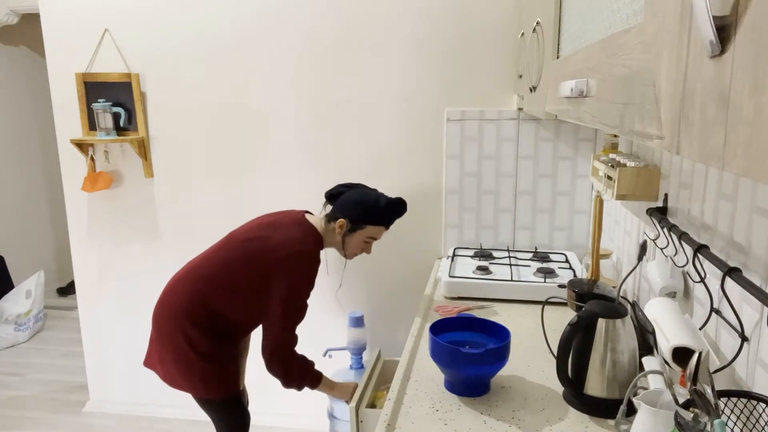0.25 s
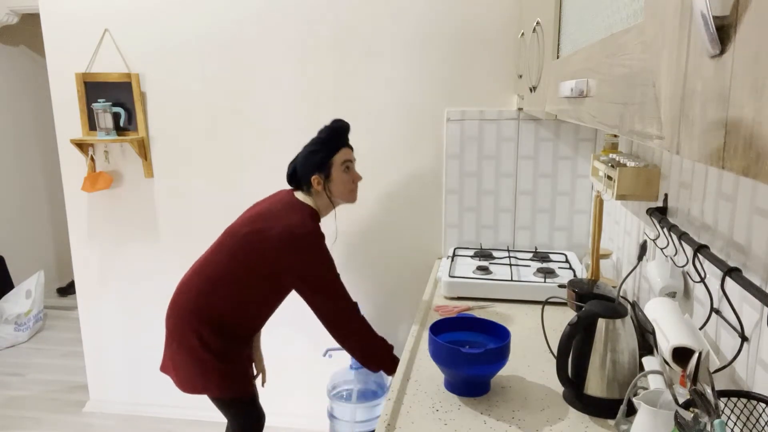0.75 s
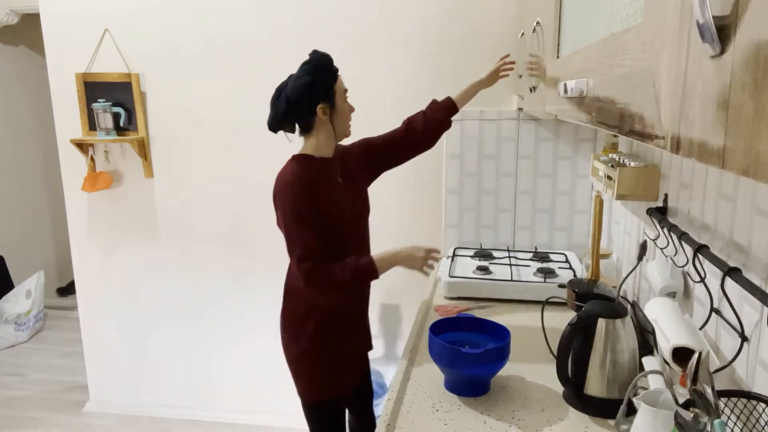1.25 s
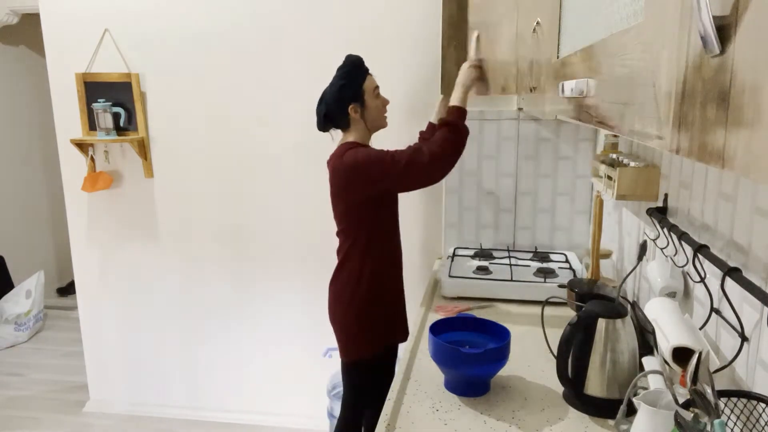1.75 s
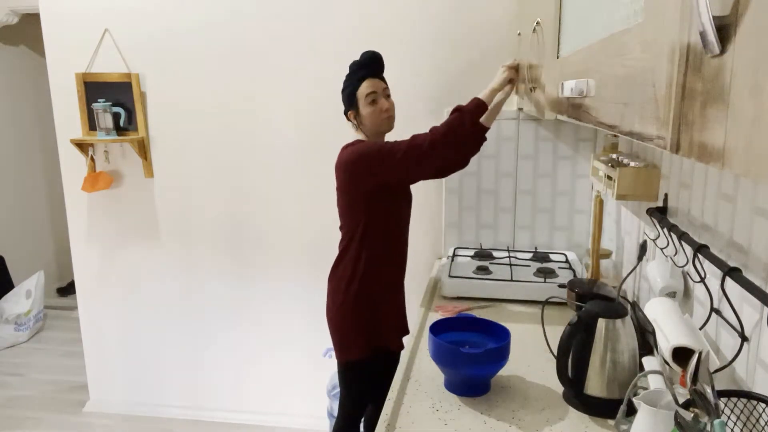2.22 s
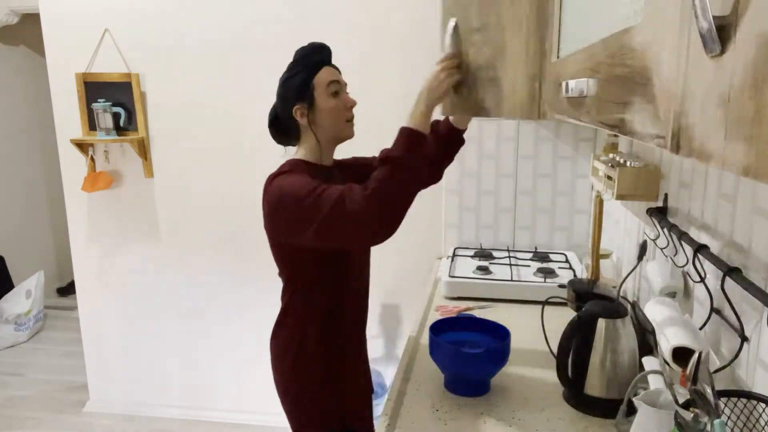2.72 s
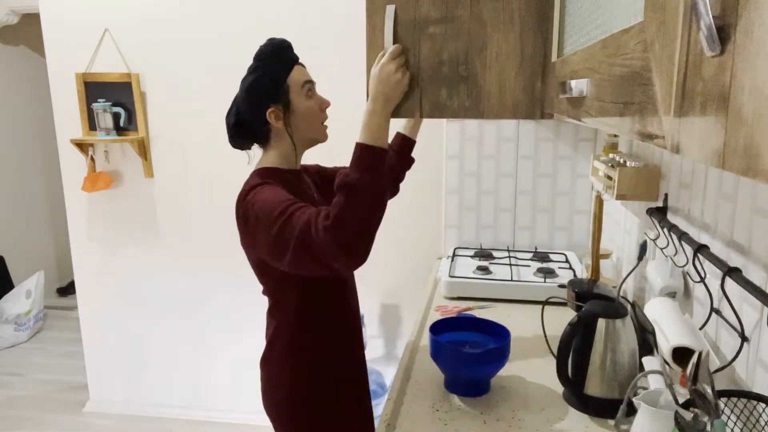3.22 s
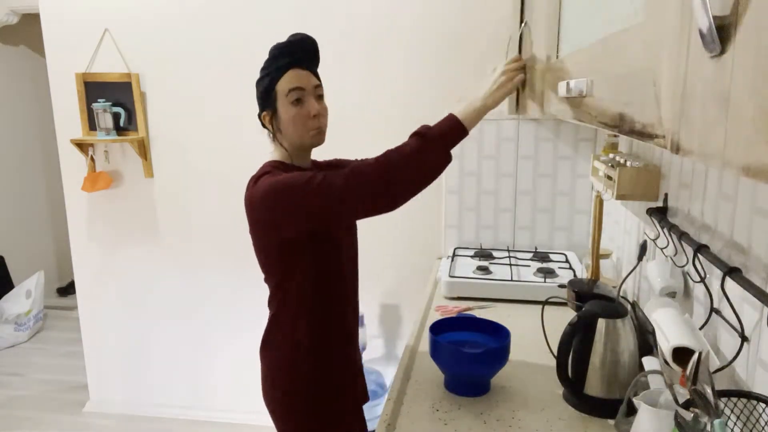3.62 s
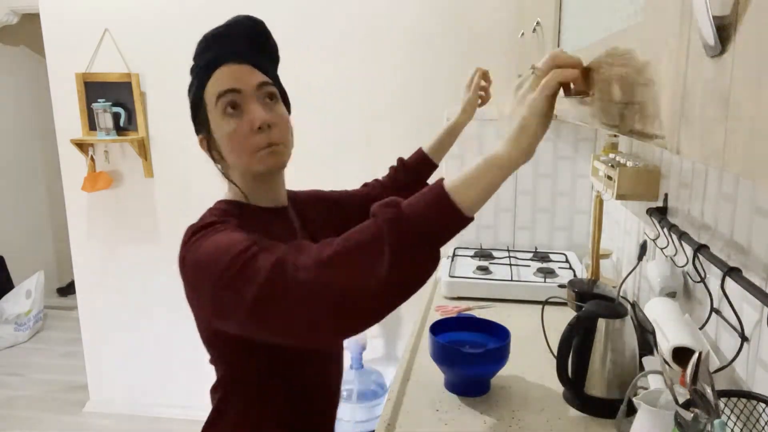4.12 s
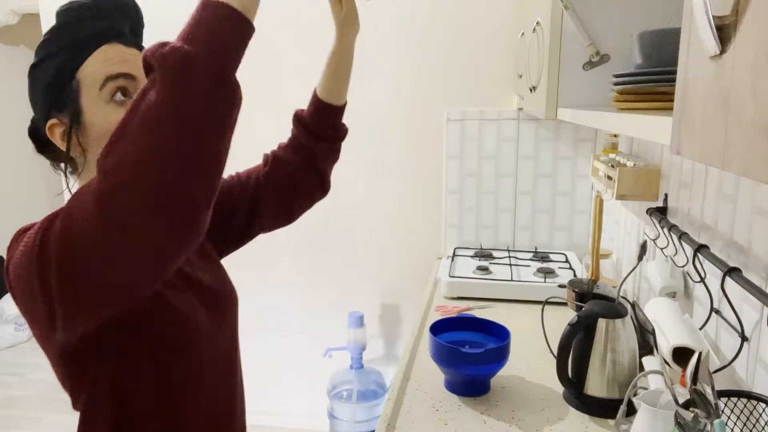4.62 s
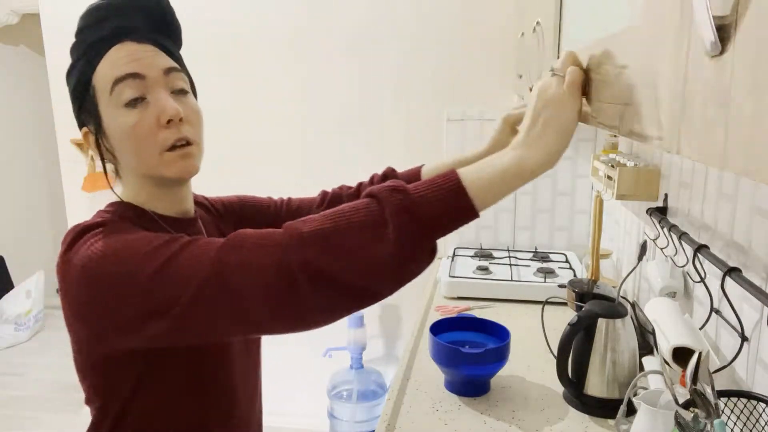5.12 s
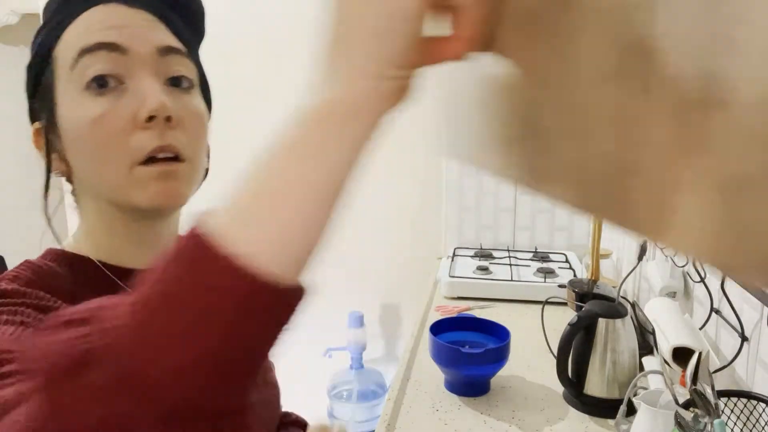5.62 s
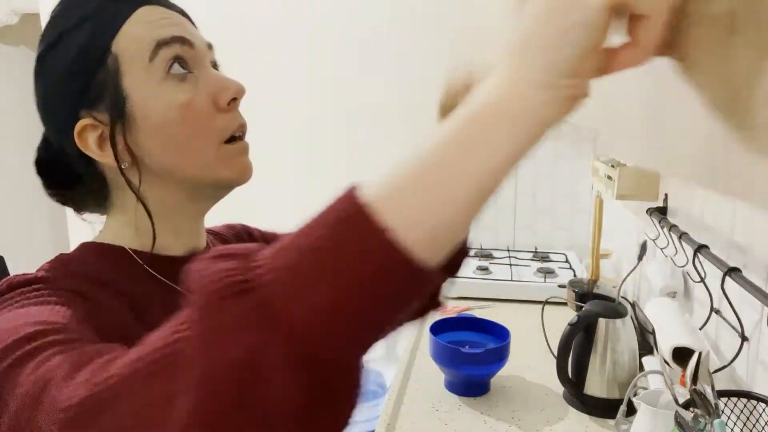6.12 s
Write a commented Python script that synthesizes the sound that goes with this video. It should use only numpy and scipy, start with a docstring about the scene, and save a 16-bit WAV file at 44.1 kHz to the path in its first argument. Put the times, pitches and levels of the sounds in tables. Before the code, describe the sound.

Fixed stereo pickup in a quiet, hard-walled kitchen, sounds leaning slightly right. A drawer judders open with rising roller jolts, clacks, then rolls shut. Loose wooden knocks crowd into two strong cupboard bangs, the boxes booming briefly. Quiet again, then a boomy shut with crisp double clacks. Later doors come closer and drier: steely hinge clicks, a thin spring ping, small rattles, a sharper knock, and faint final thuds.

```python
"""Cupboard doors knock, thud and slam in a small tiled kitchen, after a drawer is rolled out and pushed home.
Each blow is a click and shaped noise, with ringing woodwork and a brief hard-walled tail.
Cupboard boxes boom at their own notes; sprung hinges click and ping as noise bursts and sagging coil partials.
The drawer is grainy roller noise, wooden judder and rising jolts; filtered noise makes the sleeves, the scrapes,
the tails of spring snaps, the moving doors and the soft room tone."""
import sys
import numpy as np
from scipy import signal
from scipy.io import wavfile

SR = 44100
rng = np.random.default_rng(int(sys.argv[2]) if len(sys.argv) > 2 else 0)


def store_wav(level_fs):
    """Save 16-bit WAV to argv[1]."""
    pcm = np.round(np.clip(np.atleast_2d(level_fs), -1, 1) * 32767)
    wavfile.write(sys.argv[1], SR, pcm.T.astype(np.int16))


N = 280211

# where thud, knock, clack, crack and tick lie: centre_hz
COLOUR_HZ = [90, 320, 880, 2200, 6000]
# decay of the kitchen's tail: pitch_hz, t60_s
KITCHEN_T60 = [(60, 0.44), (120, 0.24), (250, 0.36), (700, 0.35), (2000, 0.41), (5000, 0.43), (12000, 0.31)]
# noise bands: edges and centres in Hz, and one filter each
EDGES = np.r_[25, 50, 100, 160, 230, 320 * 2 ** np.arange(0, 6.1, .5)]
CENTRES = np.sqrt(EDGES[1:] * EDGES[:-1])
BANK = [signal.butter(2, edges, "band", fs=SR, output="sos") for edges in zip(EDGES, EDGES[1:])]
TAIL = np.arange(int(.44 * SR)) / SR   # time axis of one struck sound, s


def from_db(db):
    """Decibels to gain."""
    return 10 ** (np.asarray(db) / 20)


def rms_one(x):
    """Scale to rms 1."""
    return x / np.sqrt(np.mean(x ** 2) + 1e-20)


def at_hz(points, hz):
    """Read a table on a log-frequency axis."""
    points = np.array(points)
    return np.interp(np.log(hz), np.log(points[:, 0]), points[:, 1])


def dying(t60):
    """A decay of 60 dB in t60 seconds."""
    return np.exp(-np.log(1000) * TAIL / max(t60, 1e-3))


def add(track, s, sound):
    """Lay a sound into the track at time s."""
    start = max(round(s * SR), 0)
    track[:, start:start + sound.shape[1]] += sound[:, :N - start]


def wander(per_s):
    """A random curve over the whole scene, gliding between per_s new values a second."""
    return np.interp(np.arange(N) / SR * per_s, np.arange(N), rng.standard_normal(N))


def pair(white, hz):
    """Mix two noises to left and right with the stereo likeness of this pitch."""
    # pitch_hz, left-right correlation
    likeness = [(40, 0.27), (100, 0), (200, 0.032), (400, 0), (1000, 0), (15000, 0)]
    alike = np.clip(at_hz(likeness, hz), -1, 1)
    middle = np.sqrt((1 + alike) / 2) * white[0]
    side = np.sqrt((1 - alike) / 2) * white[1]
    return middle + side * [[1], [-1]]


def friction(spectrum, grain_db, grains_per_s):
    """Stereo noise whose strength glides from one tiny slip to the next; rms 1."""
    slips = wander(grains_per_s)
    white = rng.standard_normal((2, 2, N)) * from_db(grain_db * slips)
    out = np.zeros((2, N))
    for k, hz in enumerate(CENTRES):
        if spectrum[0][0] < hz and EDGES[k] < spectrum[-1][0]:
            band = signal.sosfilt(BANK[k], pair(white[k % 2], hz))
            out += from_db(at_hz(spectrum, hz)) * band
    return rms_one(out)


def strokes(rows, attack_db_per_s, release_db_per_s):
    """Gain over time of movements that gather speed, hold it and die away."""
    t = np.arange(N) / SR
    levels = []
    for start, length, db in rows:
        before = np.maximum(start - t, 0)
        after = np.maximum(t - start - length, 0)
        levels.append(db - attack_db_per_s * before - release_db_per_s * after)
    return from_db(np.maximum(np.max(levels, axis=0), -150))


def resonance(x, hz, width):
    """A two-pole resonance with gain 1 at its top."""
    r = np.exp(-np.pi * width / SR)
    poles = [1, -2 * r * np.cos(2 * np.pi * hz / SR), r * r]
    return (1 - r * r) / 2 * signal.lfilter([1, 0, -1], poles, x + 1e-18)


def ring(modes, pitch=0.96, tilt_db=0.0, room_db=-16.0, rise_s=0.00084, detune=0.0099):
    """Struck modes (Hz, dB, t60 s) scaled by pitch; each leaves a fainter, detuned tail in the kitchen."""
    out, swell = 0, 1 - np.exp(-TAIL / max(rise_s, 1e-4))
    for hz, db, t60 in modes:
        hz = hz * pitch
        phase = rng.uniform(0, 2 * np.pi) + rng.uniform(0, np.pi, (2, 1))
        direct = np.exp(2j * np.pi * hz * TAIL) * dying(t60)
        tail_hz = hz * (1 + detune * rng.standard_normal())
        tail = np.exp(2j * np.pi * tail_hz * TAIL) * dying(at_hz(KITCHEN_T60, hz))
        tail = from_db(room_db) * tail * np.exp(2j * np.pi * rng.random((2, 1)))
        sides = direct * np.exp(1j * phase) + tail
        octaves = np.log2(hz / (modes[0][0] * pitch))
        out = out + from_db(db + tilt_db * octaves) * sides.imag
    return out * swell


def doors(level_db=-5.0, lead_s=.0005):
    """All shuts, bumps and clicks, sounding through the cupboards' woodwork."""
    hits = np.zeros((2, N))
    for s, sound in [*shuts(), *bumps(), *clicks()]:
        add(hits, s - lead_s, carcass(sound))
    return from_db(level_db) * hits


def shuts(clack_gain_db=4.0):
    """Each panel clacks on its stop, flexes, and falls back once more, duller; yields (s, sound)."""
    # a door or the drawer meets its stop; levels are relative: start_s, level_db, weight_db, hardness_steps,
    # panel_ring_s, rebound_after_s, rebound_db, low_note_hz, low_note_lift_db, rebound_note_hz,
    # clack_db, clack_pitch_ratio, door_modes_db
    stops = [(0.265, -29, 5.5, 1, 0.18, 0.031, -6.5, 81.7, 1, 88, -34.5, 2.07, -1),
             (0.789, -44.5, 10.5, 0.5, 0.083, 0.039, -6.5, 81.5, 6.5, 71.6, -42, 2.2, -13),
             (2.132, -23, -2, -3, 0.1, 0.055, -5.5, 136.6, 16, 141, -27.5, 0.78, -8),
             (2.366, -22.5, 4, 4.5, 0.2, 0.036, -7, 82.1, 5, 83.8, -17.5, 1.16, -0.5),
             (3.63, -37, 2, -4, 0.18, 0.03, -11, 155.6, 2, 91.8, -48.5, 1.17, -15),
             (3.879, -29, 8.5, 0.83, 0.036, 0.038, -12.5, 81.3, -6, 295, -28, 0.99, -14),
             (3.948, -36, 2.5, 3, 0.15, 0.035, -12.5, 42.5, 5, 313, -25.5, 1.04, 0.5),
             (5.055, -38.5, 2, -2.2, 0.073, 0.056, -28, 86.7, 3.5, 77.6, -37, 0.99, -8),
             (5.221, -34.5, 5, 2.5, 0.26, 0.067, -6.5, 286, 16, 112, -35, 0.74, -1),
             (6.184, -41.5, 1.5, -6, 0.11, 0.043, -17.5, 122.8, 7.5, 108.4, -42.5, 1.47, -8.5)]
    # level_db of thud, knock, clack, crack and tick of wood on wood
    wood_colour_db = [4, -1, 13.5, -10, -23.5]
    # quick, woody clack of a door's edge on the frame, before the pitch ratio: pitch_hz, level_db, t60_s
    edge_modes = [(461, 4, 0.072), (726, -8.5, 0.08), (1250, -8.5, 0.074), (1862, -1, 0.046),
                  (2610, -6, 0.058), (3380, -16, 0.014)]
    rebound_softens, rebound_ring_s = 5.6, 0.17   # hardness steps lost by the second touch, and its ring
    rebound_note_db = 8   # lift of the note that the second touch sets ringing
    gentle_contact_s = 0.00044   # contact time added by each step of hardness below zero
    clack_dulls_db = 1   # treble lost per octave for each step of hardness below zero
    for (s, level_db, weight_db, hardness, ring_s, after_s, rebound_db, low_hz, low_db, rebound_hz,
         clack_db, pitch, modes_db) in stops:
        first = colour(wood_colour_db, level_db, weight_db, hardness)
        gentle_s = gentle_contact_s * max(-hardness, 0)
        hit = strike(s, level_db, first, ring_s, click_db=6.0, padding_s=0.0003 + gentle_s)
        hit = hit + from_db(low_db) * bending(low_hz, first)
        tilt_db = clack_dulls_db * min(hardness, 0)
        clack = ring(edge_modes, pitch, tilt_db, room_db=-21.5, rise_s=0.0027 + gentle_s)
        yield s, door_modes(hit, modes_db) + from_db(clack_gain_db + clack_db) * clack

        again_s, again_db = s + after_s, level_db + rebound_db
        second = colour(wood_colour_db, again_db, weight_db, hardness - rebound_softens)
        note = from_db(rebound_note_db) * bending(rebound_hz, second)
        hit = strike(again_s, again_db, second, rebound_ring_s, click_db=1.5, padding_s=0.0005) + note
        yield again_s, door_modes(hit, modes_db)


def bumps(hollow_gain_db=6.0, note_cycles=15.2):
    """Soft knocks, each with the low note, hollow note and ring time of its place; yields (s, sound)."""
    # hands, handles, rollers and loose panels bump; levels are relative: start_s, level_db, weight_db,
    # hardness_steps, low_note_hz, hollow_note_hz, hollow_note_db, ring_time_multiple
    knocks = [(0.118, -30.5, 4.5, -6.5, 73.4, 280, -18, 1.2), (0.3, -31.5, 12.5, -6, 143, 467, -20, 1),
              (0.345, -48, 4, -6, 78.5, 268, -33, 1), (0.385, -45, 17.5, -13, 90, 265, -34, 1),
              (0.448, -39.5, 16, -0.5, 63.7, 297, -26, 1), (0.558, -31, 2.5, -8, 224, 255, -40, 1),
              (0.581, -42, 9, 4.5, 85, 433, -25, .9), (0.612, -50, 10, -2, 150, 390, -30.5, .8),
              (0.644, -35, -2, -1, 168, 466, -25, .8), (0.679, -37, -5, 2.5, 88.5, 245, -23, .9),
              (0.712, -43, 4, 2, 111, 630, -29.5, .9), (0.728, -44.5, 21.5, -21, 59.6, 617, -53, 1),
              (0.811, -41, 12.5, -7, 127, 265, -27, .9), (0.834, -47.5, 10.5, -19, 99, 271, -38.5, .8),
              (1.409, -44, 15, -1.5, 84.1, 690, -44, 1), (1.571, -43, -6, -3, 94, 280, -44, 1),
              (1.683, -44.5, 3.5, -2.5, 88, 964, -44.5, 1), (1.777, -32.5, -3, 0, 212, 866, -35.5, .9),
              (1.877, -34, -4, -1.5, 150, 560, -34.5, 1), (1.931, -25.5, 0, -0.5, 145, 385, -19.5, .9),
              (1.955, -26, -11, -1, 151, 500, -22, 1.1), (1.983, -34.5, 3, -4, 133, 476, -28, 1),
              (2.081, -36, 0, -2, 149, 589, -28, .8), (2.093, -26.5, -7, -17.5, 197, 292, -15, .7),
              (2.128, -28.5, -6, -1.5, 139, 1192, -23, .8), (2.158, -25.5, 6.5, -8, 143, 771, -23, 1),
              (2.267, -27.5, 9, 0, 123.6, 520, -34, .95), (2.408, -33.5, 11, -5, 104, 660, -29, 1),
              (2.438, -34.5, 10.5, -3, 70, 530, -37, .6), (2.478, -32, 0, -10, 227, 930, -30.5, .8),
              (2.732, -57.5, 24, 4, 93.4, 402, -61, 1), (2.975, -42.5, 15, 0.5, 154.5, 730, -52, .9),
              (3.042, -35, 4, -21, 95.8, 347, -36.5, 1), (3.409, -68, 15.5, -5.5, 81.4, 423, -67, 1),
              (3.659, -45, -2.5, -1, 341, 695, -37, 1.1), (3.9, -33.5, 6, -5.5, 125, 772, -31, .7),
              (4.224, -50, 12, 6.5, 263, 525, -42, .8), (4.332, -36.5, 6.5, 1.5, 279, 454, -43, .9),
              (4.355, -29, -1, -3.5, 256, 294, -30.5, .8), (4.435, -36, 10.5, 2.5, 120, 295, -34, .7),
              (4.46, -31, 7, 4.5, 86, 1287, -39, .7), (4.53, -35.5, 4.5, -8, 98, 1390, -46, .8),
              (4.664, -37.5, 0, 0.5, 130, 883, -40, .8), (4.703, -43, -12, -1, 126, 860, -50, .7),
              (4.859, -39.5, 6, -8, 129.3, 330, -69, .9), (4.895, -36, 0, -6, 90.6, 375, -45, .9),
              (5.484, -37.5, 6.5, -3.5, 173, 410, -39, .5), (5.502, -33.5, 8, -15, 87, 335, -29, .6),
              (5.56, -52, -8, -6, 238, 640, -48, .5), (5.574, -42.5, -1.5, -11, 190, 517, -39, .5),
              (5.75, -54, 9.5, -1, 123, 270, -54, .7), (5.913, -57.5, -1.5, -10, 232, 423, -60.5, 1.3),
              (6.108, -56.5, 6, -6, 91.3, 380, -55, .7), (6.218, -47.5, 5, -6, 134.4, 292, -45, .7)]
    # level_db of thud, knock, clack, crack and tick; a padded contact has little treble
    padded_colour_db = [-3, -4, -0.5, -24, -27]
    # modes of the hollow note, before the ring multiple: pitch_multiple, level_db, t60_s
    hollow_modes = [(.66, -10.5, 0.079), (.83, -6, 0.053), (.96, -2, 0.068), (1.029, -4, .07),
                    (1.45, -16, 0.041), (1.95, -17.5, 0.063)]
    ring_s, note_db = 0.15, 7.5   # ring of the panel before its multiple; lift of the low note
    for s, level_db, weight_db, hardness, low_hz, hollow_hz, hollow_db, rings in knocks:
        colour_db = colour(padded_colour_db, level_db, weight_db, hardness)
        modes = [(ratio, db, t60 * rings) for ratio, db, t60 in hollow_modes]
        hollow = from_db(hollow_gain_db + hollow_db) * ring(modes, hollow_hz, room_db=-18.0, rise_s=0.0022)
        low = from_db(note_db) * bending(low_hz, colour_db, cycles=note_cycles * rings)
        knock = strike(s, level_db, colour_db, ring_s * rings, click_db=-12.0, padding_s=0.0003)
        yield s, knock + low + hollow


def clicks():
    """Metal catches and handles touch, light and bright; yields (s, sound)."""
    # start_s, level_db (relative)
    touches = [(0.265, -33.5), (0.787, -44.5), (1.469, -49), (1.776, -61), (4.223, -53.5), (4.457, -51),
               (5.48, -50), (5.498, -51.5), (5.53, -65), (5.563, -67)]
    # level_db of thud, knock, clack, crack and tick
    metal_colour_db = [-4.5, -2, 0, -5.5, -1]
    for s, level_db in touches:
        colour_db = level_db + np.array(metal_colour_db)
        yield s, strike(s, level_db, colour_db, ring_s=0.032, click_db=7.0, padding_s=0)


def colour(base_db, level_db, weight_db, hardness):
    """Weight adds to the thud; hardness lifts everything above the knock."""
    # db_per_hardness_step for thud, knock, clack, crack and tick
    hardness_db = [0, 0, 1.5, 2.5, 4]
    out = level_db + np.array(base_db) + hardness * np.array(hardness_db)
    return np.r_[out[0] + weight_db, out[1:]]


def strike(s, level_db, colour_db, ring_s, click_db, padding_s):
    """A blow at time s: the stronger it is, the shorter the contact; padding draws it out."""
    # how much kitchen each blow carries: time_s, room_db
    room_amount = [(0, -3), (1.8, -6), (2.4, -4.5), (3.0, -10.5), (3.9, -7.5), (4.4, -16), (5.1, -19.5),
                   (5.55, -16.5), (6.2, -10.5)]
    room_db = np.interp(s, *np.transpose(room_amount))
    loudest_contact_s, shortens = 0.00029, 0.23   # contact at 0 dB; dB of contact time lost per dB of force
    contact_s = padding_s + loudest_contact_s * from_db(-shortens * level_db)
    return blow(colour_db, ring_s, room_db, contact_s, click_db)


def blow(colour_db, ring_s, room_db, contact_s, click_db, wall_s=0.0066, body_s=0.004, body_cycles=3.38):
    """One contact: a click, the dense ring of the panel, then the kitchen's tail, band by band."""
    # general colour of a struck panel: pitch_hz, level_db
    panel_colour = [(35, -11.5), (70, -5.5), (130, -2), (200, 1), (450, -5.5), (620, -7), (900, -20),
                    (1400, -9), (2000, 3), (2800, 0), (4000, -4), (6000, -7), (10000, -12), (15000, -17.5)]
    # how long each region rings in the panel: pitch_hz, ring_time_multiple
    panel_ring = [(60, 2.4), (150, 1.7), (400, 1.1), (1000, .6), (3000, .5), (12000, .6)]
    white, out = rng.standard_normal((2, 2, len(TAIL))), 0
    click = np.zeros((2, len(TAIL)))
    click[[0, 1], rng.integers(130, 200, 2)] = from_db(click_db) * 2   # 3 to 4.5 ms in, apart on each side
    grip = (1 - np.exp(-TAIL / max(contact_s, 1e-4))) ** 2   # the faces meet gradually
    walls = from_db(room_db) * grip * (1 - np.exp(-TAIL / wall_s))
    for k, hz in enumerate(CENTRES):
        panel = grip * dying(ring_s * at_hz(panel_ring, hz))
        room = walls * dying(at_hz(KITCHEN_T60, hz))
        noise = pair(white[k % 2], hz) * np.sqrt(panel ** 2 + room ** 2)
        band = signal.sosfilt(BANK[k], noise + click * (-1) ** k)
        # the blow's strength in this band is that of its first few cycles
        strength = np.sqrt(np.mean(band[:, :int((body_s + body_cycles / hz) * SR)] ** 2))
        level_db = np.interp(np.log(hz), np.log(COLOUR_HZ), colour_db) + at_hz(panel_colour, hz)
        out = out + band * (from_db(level_db) / strength)
    return out


def bending(hz, colour_db, cycles=15.5, spread=0.24):
    """The panel flexes at one low note that swells in about a cycle, out of step on the two sides."""
    phase = rng.uniform(0, 2 * np.pi) + spread * np.array([[.5], [-.5]])
    swell = (1 - np.exp(-TAIL * hz)) * dying(cycles / hz)
    level_db = 9 + np.interp(np.log(hz), np.log(COLOUR_HZ), colour_db)
    return from_db(level_db) * swell * np.sin(2 * np.pi * hz * TAIL + phase)


def door_modes(sound, modes_db, spread_db=2.5):
    """A blow sets the door's modes ringing, each with a random strength."""
    # pitch_hz, width_hz, lift_db (before the strength of each blow)
    panel_modes = [(233, 14, 0), (530, 22, -2), (744, 16, -4), (895, 18, -4), (1008, 16, -3), (1158, 14, 2),
                   (1402, 28, -2), (1508, 14, -4), (1714, 24, -7), (1892, 34, 2.5), (2300, 20, -4),
                   (2470, 24, -4), (2667, 18, -3)]
    lifts = modes_db + spread_db * rng.standard_normal(len(panel_modes))
    ringing = sum(from_db(db + lift) * resonance(sound, hz, width)
                  for (hz, width, db), lift in zip(panel_modes, lifts))
    return sound + ringing


def carcass(sound):
    """The sides and shelves draw energy from a blow and give it back at their modes, differently each time."""
    # pitch_hz, width_hz, lift_db (before the random lift of each blow)
    shelf_modes = [(350, 14, -4), (390, 14, -4), (448, 16, -6), (565, 14, -6), (612, 18, -7), (668, 20, -8),
                   (802, 22, -7), (867, 16, -6), (921, 16, -4), (1077, 16, -4)]
    lifts = 3 * rng.standard_normal(len(shelf_modes))
    drawn = .25 * resonance(sound, 600, 700)
    given_back = sum(from_db(db + lift) * resonance(sound, hz, width)
                     for (hz, width, db), lift in zip(shelf_modes, lifts))
    return sound - drawn + given_back


def booms(spread=0.74):
    """Cupboard boxes take up blows, swell and ring on at their own notes, out of step on the two sides."""
    # start_s, pitch_hz, level_db, swell_s, t60_s
    box_notes = [(1.396, 87, -33, 0.018, 0.12), (1.953, 423.3, -33, .012, 0.23),
                 (2.137, 410, -27.5, 0.011, 0.18), (2.177, 228.7, -23, 0.015, 0.21),
                 (2.186, 138.6, -21, 0.013, 0.12), (2.389, 236.5, -20, .022, 0.19),
                 (3.607, 155.4, -21, 0.035, 0.064), (3.639, 495.5, -38.5, 0.023, 0.13),
                 (4.663, 828, -35.5, 0.0034, 0.051), (5.499, 466, -40, 0.007, 0.12),
                 (5.546, 441, -44.5, .02, .11), (5.559, 229, -38, 0.013, 0.12),
                 (6.186, 508, -41.5, .005, 0.088), (6.186, 226.4, -45, 0.0054, 0.42)]
    twin_ratio, twin_db = 1.2, -2.5   # a neighbouring mode beats against each note
    out = np.zeros((2, N))
    for s, hz, level_db, swell_s, t60 in box_notes:
        swell = np.minimum(TAIL / swell_s, 1) ** 2
        envelope = swell * from_db(-60 * np.maximum(TAIL - swell_s, 0) / t60)
        phase = 2 * np.pi * hz * TAIL + rng.uniform(0, 2 * np.pi) + spread * np.array([[.5], [-.5]])
        twin = from_db(twin_db) * np.sin(twin_ratio * phase + rng.uniform(0, 2 * np.pi, (2, 1)))
        add(out, s, from_db(level_db) * envelope * (np.sin(phase) + twin))
    return out


def hinges():
    """Springs snap over their dead point, loose parts rattle, and now and then a coil pings."""
    # springs snapping over: start_s, level_db
    spring_snaps = [(4.328, -38.5), (4.349, -48), (4.409, -62), (4.472, -44.5), (4.811, -55.5),
                    (5.2446, -37.5)]
    # hinge resonances: pitch_hz, width_hz, level_db (relative)
    steel_modes = [(3340, 110, -0.5), (4110, 150, 7.5), (4760, 140, 7.5), (5380, 370, 6.5), (6020, 650, 2),
                   (6380, 200, 4.5), (7300, 370, -10), (8600, 1200, -10.5)]
    # loose catches and hinge arms: start_s, pitch_hz, level_db
    rattles = [(4.409, 2220, -57), (4.438, 1350, -58), (4.461, 2980, -50.5), (4.472, 4000, -46),
               (4.484, 2520, -46), (4.538, 1620, -56), (4.565, 3220, -59.5), (4.666, 1680, -61),
               (4.703, 2570, -65), (4.728, 2570, -70.5), (4.769, 4500, -68), (4.782, 4570, -67),
               (4.989, 6800, -63), (5.058, 6250, -63), (5.222, 2560, -33.5), (5.532, 2040, -63),
               (5.563, 2100, -67)]
    # spring coils plucked as a hinge turns: start_s, pitch_hz, level_db, t60_s
    plucked = [(4.997, 6570, -44.5, 0.068), (5.01, 3430, -67, 0.4)]
    rattle_width_hz = 130
    out = np.zeros((2, N))
    for s, level_db in spring_snaps:
        add(out, s, from_db(level_db) * snap(steel_modes))
    for s, hz, level_db in rattles:
        rattle = snap([(hz, rattle_width_hz, 0)], rattle_t60=0.042, room_db=-29.0)
        add(out, s, from_db(level_db) * rattle)
    for s, hz, level_db, t60 in plucked:
        add(out, s, from_db(level_db) * ping(hz, t60))
    return out


def snap(modes, rattle_t60=0.092, room_db=-16.5, rise_s=0.00032):
    """A short rattle of steel on steel in the given resonances, then the kitchen's tail; starts at rms 1."""
    room = from_db(room_db) * dying(at_hz(KITCHEN_T60, modes[0][0]))
    envelope = (dying(rattle_t60) + room) * (1 - np.exp(-TAIL / rise_s))
    rattle = rng.standard_normal((2, len(TAIL))) * envelope
    steel = sum((-1) ** k * from_db(db) * resonance(rattle, hz, width)
                for k, (hz, width, db) in enumerate(modes))
    return steel / np.sqrt(np.mean(steel[:, :SR // 100] ** 2))   # rms of the first 10 ms


def ping(hz, t60, rise_s=0.0021, waver=0.012, flutter_db=1.5):
    """A spring coil slips and rings with a few thin partials, wavering as it drags on the hinge arm."""
    # pitch_multiple, level_db
    coil_partials = [(0.502, -12), (1, -1), (1.05, -7), (1.566, -11)]
    sag_per_s = 0.98   # share of its starting pitch that a relaxing coil loses per second
    drag, grip = (np.interp(TAIL * 90, np.arange(64), row) for row in rng.standard_normal((2, 64)))
    phase = 2 * np.pi * hz * np.cumsum(1 + waver * drag - sag_per_s * TAIL) / SR
    partials = sum(from_db(db) * np.sin(ratio * phase + rng.uniform(0, np.pi, (2, 1)))
                   for ratio, db in coil_partials)
    return partials * from_db(flutter_db * grip) * dying(t60) * (1 - np.exp(-TAIL / rise_s))


def drawer(rollers_db=-7.5, box_db=-1.5):
    """Rollers chatter over uneven runners, the wood judders and the hollow box rumbles."""
    # eased, pulled out, pushed back, pressed home: start_s, length_s, level_db (before rollers_db)
    rolls = [(0.0, 0.13, -37.5), (0.14, 0.16, -28.5), (0.595, 0.12, -30), (0.79, 0.014, -29.5)]
    # the box rumbles as long as it is held: start_s, length_s, level_db (before box_db)
    held = [(0.1, 0.73, -29)]
    # roller noise: pitch_hz, level_db_per_hz
    roller_colour = [(88, 9.5), (150, -9), (244, 0.5), (346, -9.5), (631, -11.5), (1020, -21), (1220, -12),
                     (1480, -17), (5130, -31), (12500, -49.5), (15500, -45.5)]
    # box rumble: pitch_hz, level_db_per_hz
    box_colour = [(15, -39), (25, -8), (48, 11), (64, 2), (173, -27.5), (200, -10.5), (300, -38.5),
                  (390, -46), (660, -120)]
    rollers = strokes(rolls, attack_db_per_s=279, release_db_per_s=166.5)
    box = strokes(held, attack_db_per_s=74, release_db_per_s=192.0)
    uneven = from_db(1.8 * wander(45))
    chatter = uneven * friction(roller_colour, grain_db=3.0, grains_per_s=160) + 1.1 * judder()
    rumble = friction(box_colour, grain_db=1.5, grains_per_s=40)
    return from_db(rollers_db) * rollers * chatter + from_db(box_db) * box * rumble


def judder():
    """Wood catches and lets go on the runners unevenly; each catch knocks the drawer's modes; rms 1."""
    # sides and bottom, before ring()'s default pitch factor: pitch_hz, level_db, t60_s
    wood_modes = [(237.6, 4, 0.067), (304, 3, 0.086), (441, -5.5, 0.072), (524, -1.5, .08),
                  (638, -7, 0.074), (775, -7.5, 0.034), (997, -8.5, 0.064), (1140, -8, .07)]
    catches_per_s, spread_db = 85, 4
    count = int(catches_per_s * N / SR)
    moments = ((np.arange(count) + rng.random(count)) * (N - 1) / count).astype(int)
    sizes = from_db(spread_db * np.clip(rng.standard_normal(count), -2, 2))
    out = 0
    for mode in wood_modes:
        catches = np.zeros((1, N))
        catches[0, moments] = sizes * rng.uniform(-1, 1, count)
        out = out + signal.oaconvolve(catches, ring([mode]), axes=1)[:, :N]
    return rms_one(out)


def jolts(spread_db=3.5, pitch_scatter=0.076):
    """The rollers jolt unevenly along the runners and ring higher as they speed up."""
    # start_s, length_s, first_hz, last_hz, level_db
    runs = [(0.134, 0.13, 356, 756, -33.5), (0.586, 0.16, 362, 731, -34.5)]
    # ring of one jolt: pitch_multiple, level_db, t60_s
    jolt_modes = [(1, 1.5, 0.026), (1.55, -6.5, 0.019), (3.4, -15, 0.018)]
    jolts_per_s = 170
    out = np.zeros((2, N))
    for start, length, first_hz, last_hz, level_db in runs:
        for k, (late, size, off) in enumerate(rng.standard_normal((32, 3))):
            along = (k + 0.408 * late) / (jolts_per_s * length)   # share of the run covered
            glide_hz = first_hz + (last_hz - first_hz) * np.clip(along, 0, 1)
            if along < 1:
                sound = ring(jolt_modes, glide_hz * np.exp(pitch_scatter * off), room_db=-16.5)
                add(out, start + along * length, from_db(level_db + spread_db * size) * sound)
    return out


def movement(sleeve_db=1.0, scrape_db=-2.5, hiss_db=5.0, swing_db=0.0):
    """Sleeves swish, sleeves and edges scrape, spring snaps trail noise; moving doors hiss and rumble softly."""
    # Gestures, before the gains above: start_s, length_s, level_db
    # sleeve swishes
    swishes = [(1.66, 0.056, -56.5), (2.79, 0.15, -55), (5.67, 0.04, -52.5)]
    # scrapes of sleeves and wooden edges, and the noisy tails of spring snaps
    scrapes = [(0.125, 0.0083, -39), (1.42, 0.021, -54.5), (1.48, 0.0015, -44.5), (2.128, 0.0027, -43.5),
               (3.632, 0.009, -61), (4.335, 0.17, -50.5), (4.467, 0.0022, -41.5), (4.82, 0.087, -53),
               (4.9, 0.12, -59.5), (5.25, 0.0013, -38.5), (6.2, 0.02, -71)]
    # a fine, bright hiss while a door is pulled open
    hisses = [(4.14, 0.33, -66.5), (4.46, 0.13, -60.5)]
    # dull rumble of the doors swinging in the hand
    swings = [(1.57, 0.37, -42), (2.02, 0.098, -33.5), (2.55, 0.49, -45), (3.65, 0.27, -56.5),
              (4.36, 0.43, -43.5), (4.85, 0.58, -54), (5.62, 0.049, -44.5), (6.18, 0.17, -69.5)]
    # Noise colours: pitch_hz, level_db_per_hz
    # sleeve
    sleeve_colour = [(150, -34), (250, 0.5), (392, -14.5), (466, -7.5), (1220, -19.5), (2320, -16.5),
                     (3010, -21.5), (11000, -34), (13500, -45), (15500, -32)]
    # scrapes and snap tails
    scrape_colour = [(700, 2), (1400, -4), (2500, -3.5), (5000, -10), (7000, -13), (10000, -17.5),
                     (15800, -27.5)]
    # door hiss
    hiss_colour = [(1000, 0), (2500, -2), (5000, -3), (9000, -4), (12500, 1), (14000, 1), (15900, 4)]
    # door rumble
    swing_colour = [(18, -36), (30, -11.5), (65, 5), (113, 6), (260, -8), (377, -23), (628, -21),
                    (721, -26.5), (1200, -38), (1560, -60.5), (2640, -120)]
    sleeve = friction(sleeve_colour, grain_db=1.5, grains_per_s=400)
    scrape = friction(scrape_colour, grain_db=2.0, grains_per_s=400)
    hiss = friction(hiss_colour, grain_db=3.5, grains_per_s=110)
    swing = friction(swing_colour, grain_db=2.5, grains_per_s=40)
    return (from_db(sleeve_db) * sleeve * strokes(swishes, attack_db_per_s=314, release_db_per_s=238)
            + from_db(scrape_db) * scrape * strokes(scrapes, attack_db_per_s=692, release_db_per_s=203.5)
            + from_db(hiss_db) * hiss * strokes(hisses, attack_db_per_s=376.0, release_db_per_s=163)
            + from_db(swing_db) * swing * strokes(swings, attack_db_per_s=171.0, release_db_per_s=114.0))


def room_tone(level_db=-58.5):
    """The still air of the room: quiet noise, mostly low, wavering slightly in level."""
    # pitch_hz, level_db_per_hz
    air_colour = [(12, -46), (20, -16), (85, 1), (175, -18), (232, -16), (266, -18), (298, -23),
                  (505, -22.5), (549, -30), (811, -41.5), (3640, -46), (6910, -51.5), (15500, -56.5)]
    return from_db(level_db) * friction(air_colour, grain_db=1.5, grains_per_s=9)


def scene():
    """All sources, placed a little to the right, over the still air of the room."""
    # where the sound sits: time_s, left_minus_right_db
    pan = [(0, -1), (1.501, -1), (2.399, -1), (3.602, -1.5), (4.5, -1.5), (5.2, -3), (5.6, -2), (6.298, -5)]
    pan_db = np.interp(np.arange(N) / SR, *np.transpose(pan))
    sources = doors() + booms() + hinges() + drawer() + jolts() + movement()
    return sources * from_db(pan_db * np.array([[.5], [-.5]])) + room_tone()


def record(dry, low_cut_hz=30.0, top_cut_hz=16000):
    """The microphone sheds the deepest bass, the highest peaks are rounded and the top is cut."""
    heard = signal.sosfilt(signal.butter(3, low_cut_hz, "high", fs=SR, output="sos"), dry)
    rounded = heard / (1 + heard ** 4) ** .25
    return signal.sosfilt(signal.ellip(10, .1, 80, top_cut_hz, fs=SR, output="sos"), rounded)


dry = scene()
out = record(dry)
store_wav(out)
```